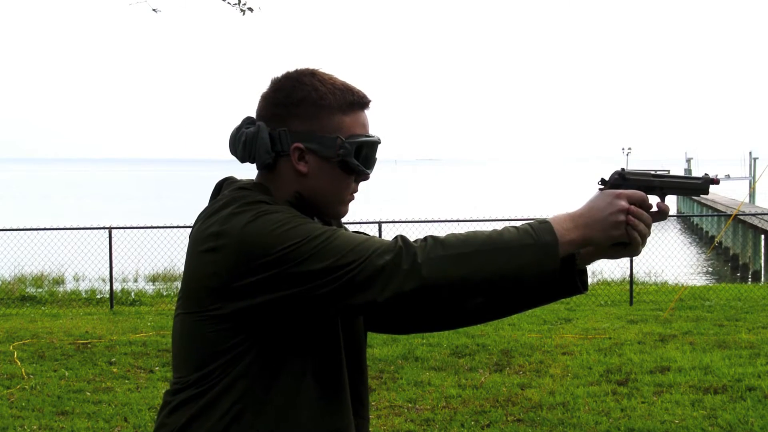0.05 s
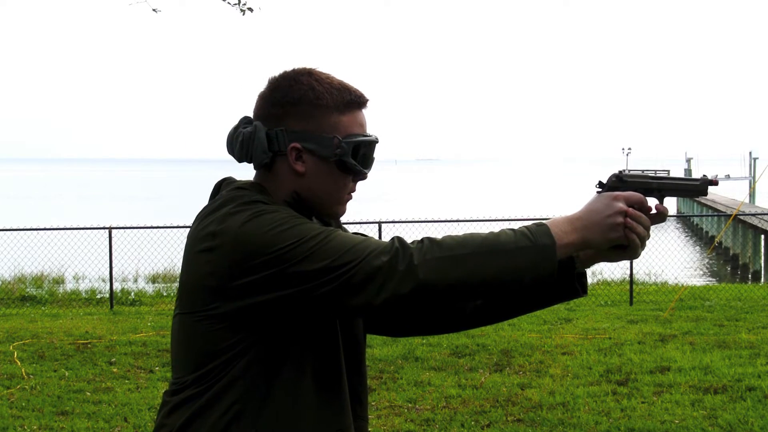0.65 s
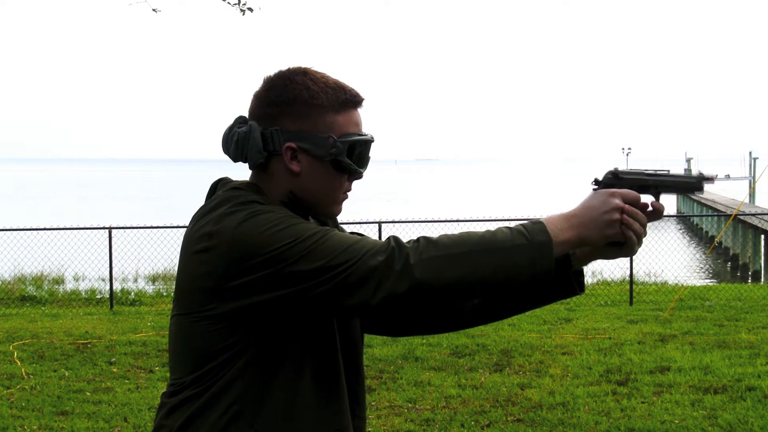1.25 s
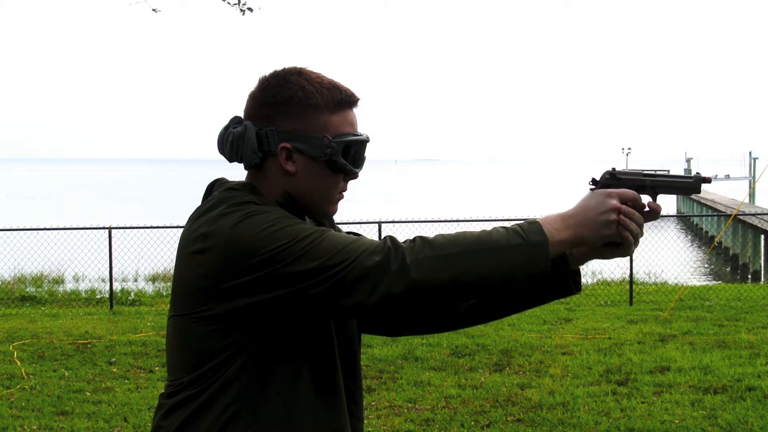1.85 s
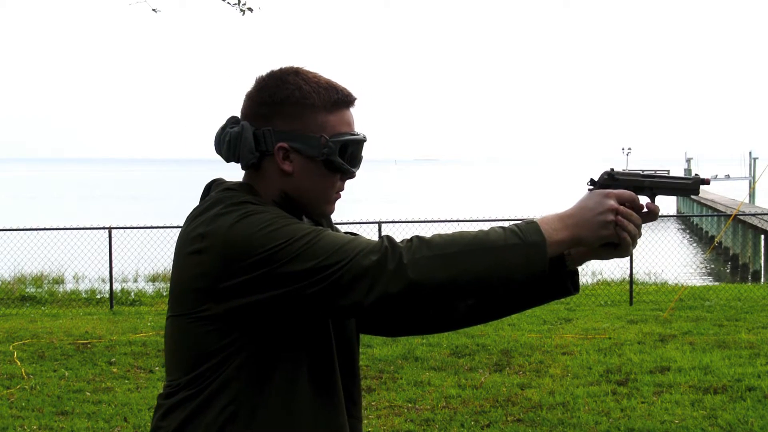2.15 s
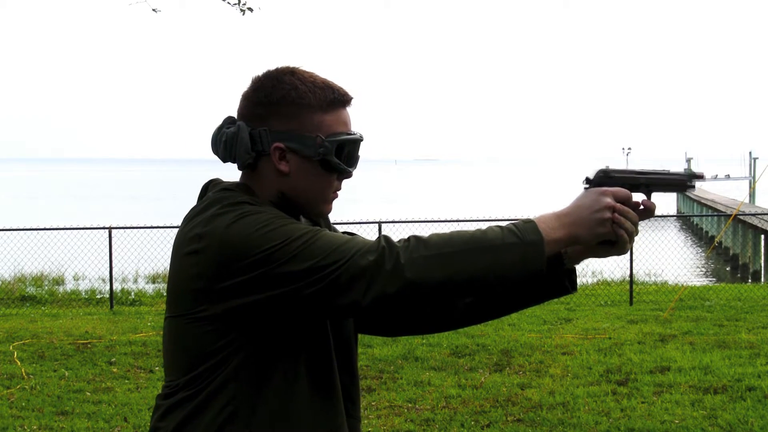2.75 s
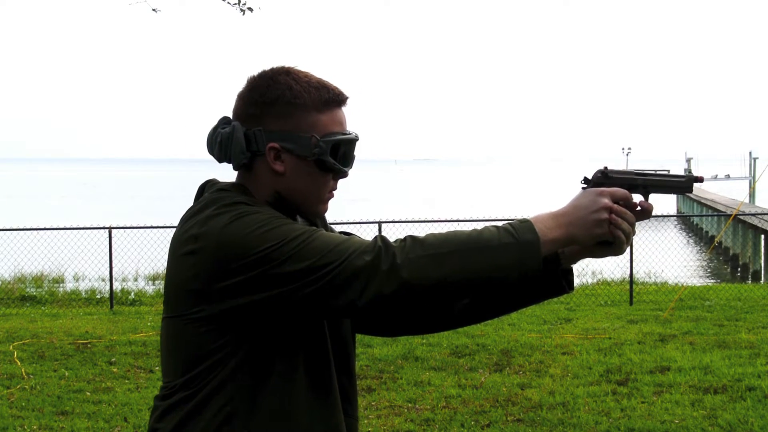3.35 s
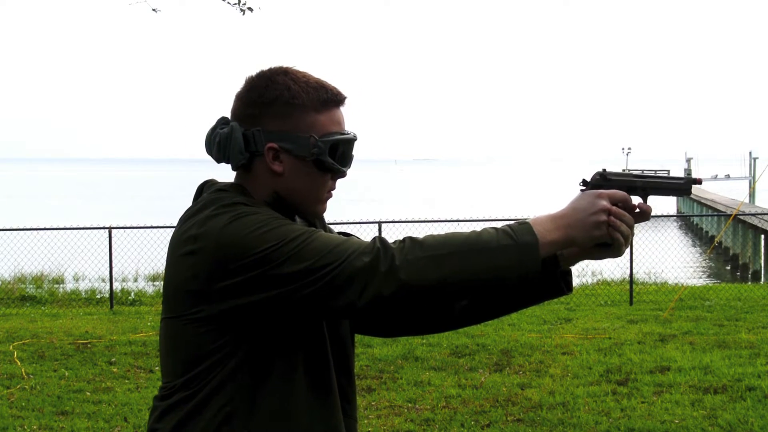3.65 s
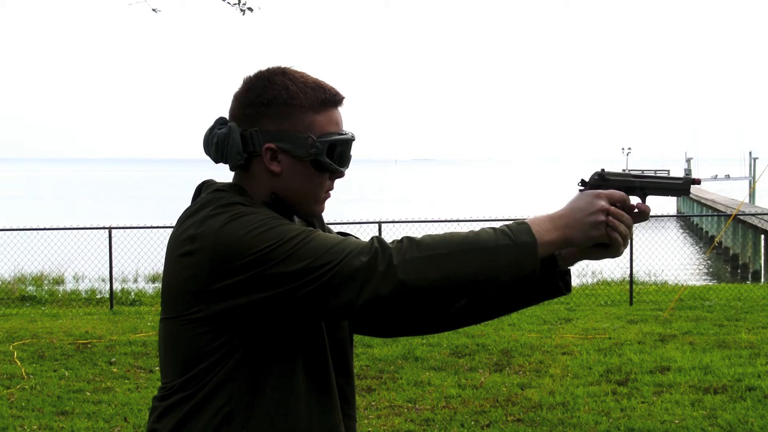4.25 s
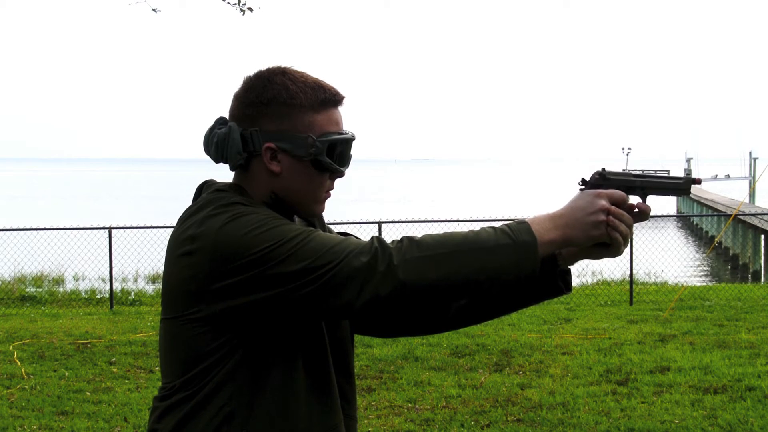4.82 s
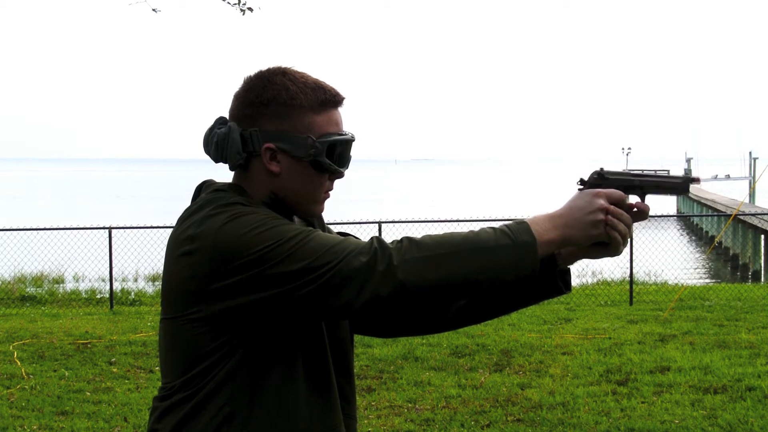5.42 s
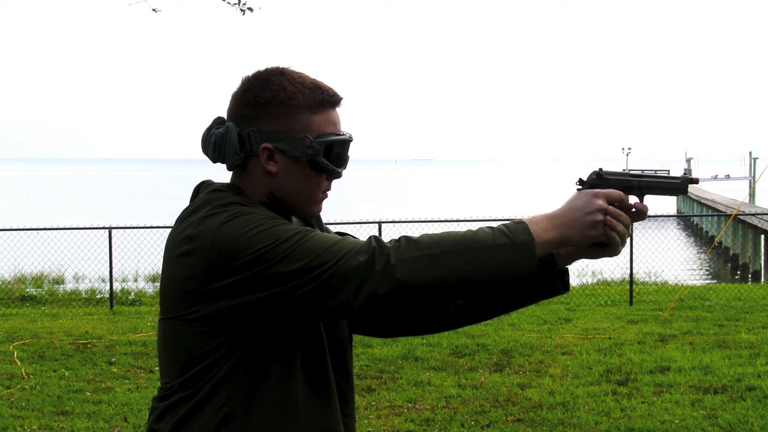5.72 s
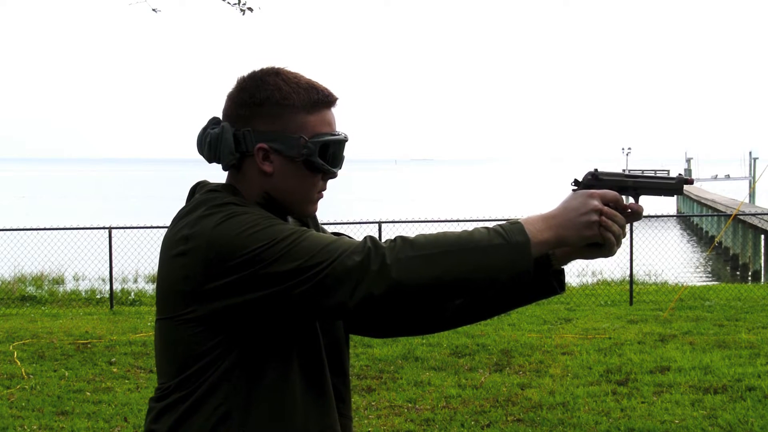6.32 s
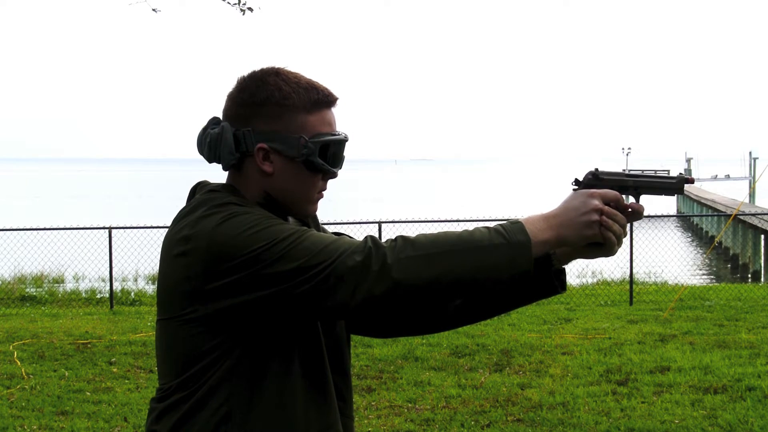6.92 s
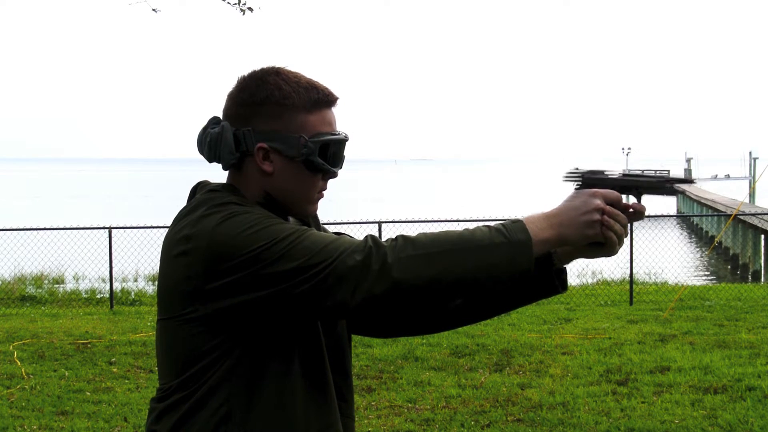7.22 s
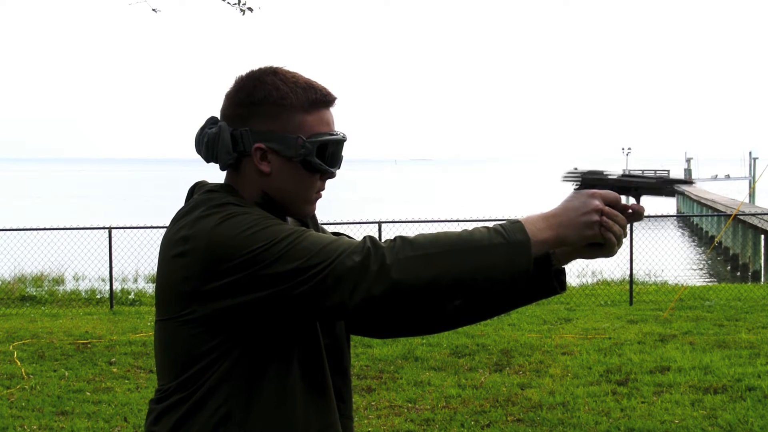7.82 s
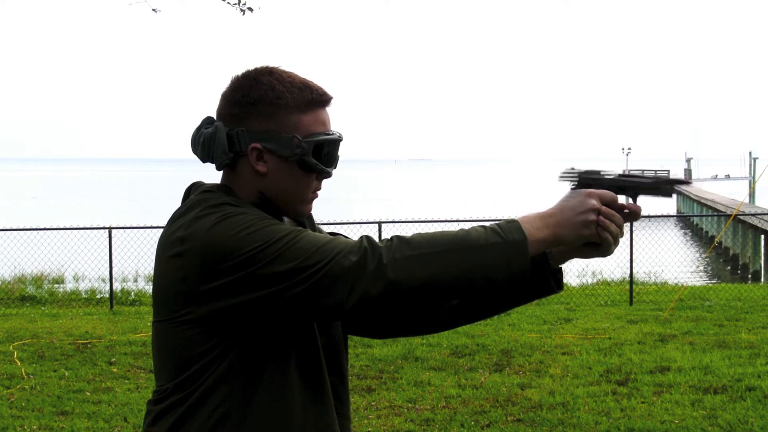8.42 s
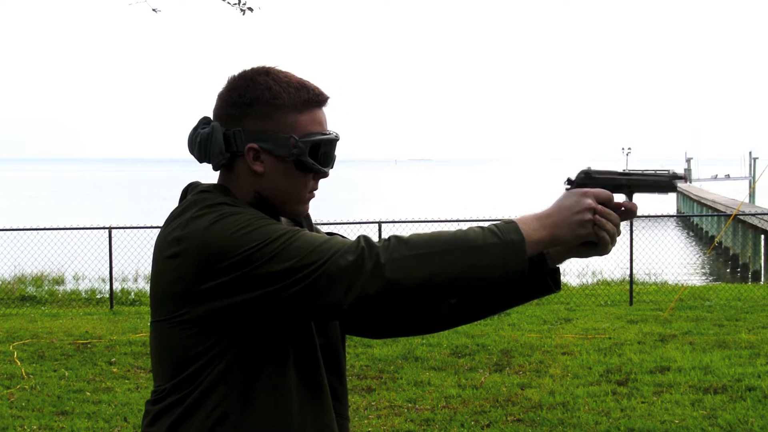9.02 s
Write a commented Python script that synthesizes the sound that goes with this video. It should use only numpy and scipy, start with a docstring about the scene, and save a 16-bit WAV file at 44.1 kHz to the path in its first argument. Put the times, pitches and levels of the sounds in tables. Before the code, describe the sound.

Outdoors, a gas airsoft pistol fires fourteen single shots close to the microphone, slightly to the right, gradually speeding up. Each is a sharp pop of gas with a metallic clack of the slide. A moment later the pellet cracks and thuds on a distant target board further right, with a short echo off nearby walls. A faint far motor, airy hiss and light wind rumble lie underneath.

```python
"""Airsoft pistol on a waterside lawn.

A gas blowback pistol fires fourteen shots close by, a little right of the stereo microphones. Each is
trigger, hammer, gas blast, then the slide flying back and slamming shut; the pellet hits a far target
further right. Nearby walls scatter it all, a distant motor drones, a breeze rumbles on the microphones,
and the recorder's gain control ducks after every overloading blast."""
import sys
import numpy as np
from scipy import signal
from scipy.fft import rfft, irfft, next_fast_len
from scipy.io import wavfile

SR = 44100
rng = np.random.default_rng(int(sys.argv[2]) if len(sys.argv) > 2 else 0)


def master(y):
    """Save y as 16-bit WAV."""
    cut = np.clip(np.atleast_2d(y).T, -1, 1)
    pcm = np.round(cut * 32767)  # scale
    wavfile.write(sys.argv[1], SR, pcm.astype(np.int16))


N = 404397
FFT_SIZE = next_fast_len(N + SR, real=True)
HZ = np.maximum(np.arange(FFT_SIZE // 2 + 1) * SR / FFT_SIZE, 1)

# The pistol's shots. Each row: start in seconds, trigger click in dB.
SHOT_CUES = [(0.3793, -19), (1.2017, -13), (1.9910, -44), (2.7120, -19), (3.4270, -21), (4.1064, -37),
             (4.7339, -23), (5.3660, -45), (5.9970, -25), (6.6259, -45), (7.2246, -32.5), (7.8259, -26),
             (8.4274, -23), (8.9806, -24)]
# Pellets on the target. Each row: start in seconds, crack in dB, board thud in dB.
PELLET_HITS = [(0.5648, -6, -17), (0.574, 1.5, -42), (1.3524, -7, -29), (1.594, -34, -35.5),
               (2.1423, -8, -16.5), (2.86, -12.5, -17.5), (3.5754, 0.5, -34), (3.584, -5.5, -46),
               (4.2593, -17, -20.5), (4.8837, -10, -20.5), (5.5184, -1.5, -34), (6.1488, -14, -22),
               (6.7765, -12.5, -22), (7.375, -14.5, -21), (7.9786, -10.5, -20), (8.5803, -17, -20.5),
               (9.1332, -2, -22.5)]
# Glancing pellets. Each row: start in seconds, level in dB, ring in Hz, relative echo in dB.
STRAY_PELLETS = [(1.3764, -35, 9000, -14), (1.5137, -30, 9800, 12.5), (1.535, -19, 10500, 2),
                 (4.4568, -40, 9000, -2), (6.4529, -25, 13900, 4.5), (6.946, -37, 11100, -12),
                 (6.953, -31, 11000, -13), (8.0006, -22, 9000, -22)]
# Wind on the microphones. Each row: time in seconds, level in dB.
BREEZE_LEVELS = [(0, -51), (1.1, -62.5), (1.9, -57.5), (3.3, -57), (5.3, -65), (9.1, -61.5)]
# Echo off the walls. Each row: frequency in Hz, seconds to fall by 60 dB.
ECHO_DECAY = [(100, 0.32), (500, 0.41), (2000, 0.44), (6000, 0.45), (10000, 0.45), (16000, 0.23)]
# The left microphone's response. Each row: frequency in Hz, gain in dB.
LEFT_MIC_RESPONSE = [(30, 0.8), (500, 3.75), (2000, 1), (4000, -0.46), (10000, 1.5), (12500, -0.5),
                     (14500, -6), (16000, -6)]

# Broad spectra. Each row: frequency in Hz, relative level in dB.
MOTOR_TONE = [(20, -28), (50, -24), (100, -6.5), (135, -8.5), (190, -6), (400, -7), (650, -6.5), (900, -9),
              (1500, -10), (3000, -11), (16000, -56)]  # distant drone
AIR_TONE = [(20, 9), (500, -6), (2000, 1), (4000, 0.5), (9000, -0.5), (12000, -2), (16000, -4.5)]  # open-air hiss
WIND_TONE = [(20, -26), (50, -6), (100, 4), (150, -1.5), (220, -11.5), (600, -31.5), (16000, -77)]  # rumble on the microphones
WALL_TONE = [(30, -24), (200, -9), (500, -5), (900, -6), (1800, 3), (4000, 0), (7000, -0.5), (11000, 1.5),
             (13000, 3.5), (16000, 4)]  # scatter off the walls
CRACK_TONE = [(30, -40), (500, -30), (2000, -11), (2800, 2.5), (4800, -4), (7500, 1), (10000, 4.5),
              (13000, 3.5), (16000, -8)]  # pellet impact
BOARD_TONE = [(30, -41), (300, -45), (550, -9.5), (750, 1), (1050, 0), (1400, -3), (2200, -0.5), (4000, 0),
              (8000, -11), (16000, -18.5)]  # thud of the target board
STAND_TONE = [(30, -17), (130, -35), (200, -1), (290, -7.5), (500, -11), (1200, -13), (16000, -72)]  # boom of its stand
METAL_TONE = [(30, -40), (200, -35.5), (500, -16.5), (1400, -22), (1800, -8), (3200, -6.5), (5000, -2.5),
              (8000, -0.5), (11000, 3), (13500, -4), (16000, -1.5)]  # slide and frame
JET_TONE = [(30, -24), (300, -19.5), (700, -7), (1400, -7), (2200, -2), (3800, -3), (6500, -4), (9500, 2),
            (12000, 0), (16000, -2.5)]  # rushing gas
POP_TONE = [(30, -13.5), (100, -13.5), (300, 1.5), (1100, -3), (2500, -2), (6000, 1), (16000, -32.5)]  # pressure pop at the muzzle
LAWN_TONE = [(30, -16), (150, -8.5), (300, -6), (500, 5.5), (720, 0.5), (900, -7), (1250, -0.5),
             (2000, -20.5), (4000, -30), (16000, -25)]  # bounce off the grass

# Resonances. Each row: centre in Hz, width in Hz, boost in dB.
MOTOR_WHINE = [(458, 8.8, 7.5), (640, 24, 5.3), (1135, 55, 10.9), (1279, 20, 13.7)]
BOARD_RESONANCES = [(824, 140, 1.7)]
SLIDE_RESONANCES = [(980, 190, 5), (1760, 140, 4.5), (2590, 130, 2.5), (6580, 560, 3), (11000, 250, 5),
                    (13560, 210, 14)]
BARREL_RESONANCES = [(2050, 210, 4.1), (3770, 360, 5.9), (4580, 230, 6.7), (9200, 1500, 1.6)]


def from_db(db):
    """Decibels to gain."""
    return 10 ** (np.asarray(db) / 20)


def samples(ms):
    """Milliseconds to samples."""
    return np.asarray(ms) * SR / 1000


def at_hz(points, hz):
    """Read a table along a log-frequency axis."""
    frequencies, values = np.transpose(points)
    return np.interp(np.log(hz), np.log(frequencies), values)


def smooth(x, ms):
    """A one-pole lag with the given time constant."""
    pole = np.exp(-1 / samples(ms))
    return signal.lfilter([1 - pole], [1, -pole], x)


def colour(x, spectrum, modes=()):
    """Causal (minimum-phase) filter of unit power gain with resonances on a broad spectrum."""
    peaks_db = sum(db / (1 + (2 * (HZ - hz) / width) ** 2) for hz, width, db in modes)
    gain = from_db(at_hz(spectrum, HZ) + peaks_db)
    gain /= np.sqrt(np.mean(gain ** 2))
    cepstrum = irfft(np.log(gain), FFT_SIZE)[:FFT_SIZE // 2]
    cepstrum[1:] *= 2
    return irfft(rfft(x, FFT_SIZE) * np.exp(rfft(cepstrum, FFT_SIZE)), FFT_SIZE)[..., :N]


def ringing(x, hz, width_hz):
    """One resonance, scaled up to make good the power a narrow band loses."""
    b, a = signal.iirpeak(hz, hz / width_hz, fs=SR)
    return signal.lfilter(b, a, x) * np.sqrt(SR / (np.pi * width_hz))


def spikes(times, height, after_ms=0):
    """One spike per event; times are in seconds."""
    out = np.zeros(N)
    index = np.round(np.asarray(times) * SR + samples(after_ms)).astype(int)
    np.add.at(out, np.clip(index, 0, N - 1), height)
    return out


def pulses(times, db, after_ms=0):
    """Single pressure pulses; dB is the level over 0.59 ms."""
    return spikes(times, from_db(db) * np.sqrt(samples(0.59)), after_ms)


def bursts(times, db, decay_ms, after_ms=0):
    """Noise that starts at once and dies away."""
    onsets = spikes(times, from_db(db), after_ms) + 1e-18
    envelope = signal.lfilter([1], [1, -np.exp(-1 / samples(decay_ms))], onsets)
    return envelope * rng.standard_normal(N)


def delayed(x, ms):
    """A later copy."""
    return irfft(rfft(x, FFT_SIZE) * np.exp(-2j * np.pi * HZ / SR * samples(ms)), FFT_SIZE)[:N]


def placed(x, lag_ms, left_db):
    """Sound from the right reaches the left microphone later and weaker."""
    return np.array([delayed(x, lag_ms) * from_db(left_db / 2), x * from_db(-left_db / 2)])


def diffuse(count, mic_spacing_s=0.00029):
    """Noise from all around: alike at both microphones in the bass, unrelated in the treble."""
    alike = np.sinc(2 * mic_spacing_s * np.arange(count // 2 + 1) * SR / count)
    mid, side = rfft(rng.standard_normal((2, count))) * np.sqrt([(1 + alike) / 2, (1 - alike) / 2])
    return irfft([mid + side, mid - side], count)


def distant_motor(start_db=-51, half_amplitude_s=6.7):
    """A far motor drones with a faint whine, fading as it recedes."""
    t = np.arange(N) / SR
    level = from_db(start_db) / (1 + t / half_amplitude_s)
    return level * colour(diffuse(N), MOTOR_TONE, MOTOR_WHINE)


def open_air(start_db=-49.5, fade_db_per_s=0.84):
    """The hiss of the open air, all around and slowly fading."""
    t = np.arange(N) / SR
    return from_db(start_db - fade_db_per_s * t) * colour(diffuse(N), AIR_TONE)


def breeze(gust_db=1.5, gust_hz=6.0):
    """A light breeze rumbles on the microphones in short gusts."""
    t = np.arange(N) / SR
    gusts = np.interp(t * gust_hz, np.arange(200), rng.standard_normal(200))
    level_db = np.interp(t, *np.transpose(BREEZE_LEVELS)) + gust_db * gusts
    return from_db(level_db) * colour(diffuse(N), WIND_TONE)


def wall_echoes(x, build_ms=9.8):
    """Nearby walls scatter the sound: in each band its energy builds and dies away as diffuse noise."""
    source = rfft(colour(x, WALL_TONE), FFT_SIZE)
    noise = rfft(diffuse(FFT_SIZE))
    centres_hz = np.geomspace(130, 15000, 13)
    echoes = 0
    for hz, share in zip(centres_hz, np.eye(len(centres_hz))):
        band = np.sqrt(np.interp(np.log(HZ), np.log(centres_hz), share))
        power = irfft(source * band, FFT_SIZE)[:N] ** 2
        power = smooth(smooth(power, build_ms), build_ms)
        fall = 1e-6 ** (1 / (SR * at_hz(ECHO_DECAY, hz)))  # share of power left after one sample
        power = signal.lfilter([1 - fall], [1, -fall], power)
        echoes += np.sqrt(power / np.mean(band ** 2)) * irfft(noise * band, FFT_SIZE)[:, :N]
    return echoes


def stray_ticks():
    """Stray pellets glance off things; returns the direct ticks and what they send to the walls."""
    direct, to_walls = 0, 0
    for start, db, hz, echo_db in STRAY_PELLETS:
        tick = bursts(start, db, decay_ms=1.8) + pulses(start, db - 4.5, after_ms=1)
        ping = ringing(tick, hz, width_hz=6000) + from_db(-9.5) * tick
        direct += ping
        to_walls += ping * from_db(echo_db)
    return direct, to_walls


def metal_ping(start_s=6.4545):
    """One stray tick comes from a small piece of metal that rings on."""
    ring = ringing(bursts(start_s, -28.5, decay_ms=60), hz=11400, width_hz=350)
    return ring + colour(pulses(start_s, -36), METAL_TONE)


def target(rebound_ms=6.2):
    """Downrange, the pellet cracks on the board, rebounds behind it, flaps it and shakes the stand."""
    times, crack_db, thud_db = np.transpose(PELLET_HITS)
    crack = pulses(times, crack_db + 0.58) + bursts(times, crack_db - 0.9, decay_ms=2.3)
    rebound = pulses(times, thud_db + 2.5, after_ms=rebound_ms)
    rebound += bursts(times, thud_db, decay_ms=4.3, after_ms=rebound_ms)
    thud = bursts(times, thud_db - 2.5, decay_ms=9.7)
    thud += bursts(times, thud_db, decay_ms=7.7, after_ms=rebound_ms)
    for flap_ms in rng.uniform(22, 60, (len(times), 3)).T:
        thud += bursts(times, thud_db - 7.5, decay_ms=5.9, after_ms=flap_ms)
    softness_db = thud_db - crack_db  # a soft hit cracks less and pushes the stand more
    boom = bursts(times, thud_db - 9.5 + 2.63 * softness_db, decay_ms=43, after_ms=rebound_ms)
    board = colour(thud, BOARD_TONE, BOARD_RESONANCES)
    return colour(crack + rebound, CRACK_TONE) + board + colour(boom, STAND_TONE)


def gas_supply(full_db=15, cooling_db_per_s=0.9749):
    """The magazine cools as it empties; returns shot times, blast levels and the dB lost to cooling."""
    times = np.transpose(SHOT_CUES)[0]
    lost_db = cooling_db_per_s * times
    return times, full_db - lost_db, lost_db


def slide_ring():
    """The slide sings on briefly after it is struck."""
    times = np.transpose(SHOT_CUES)[0]
    return ringing(bursts(times, -26, decay_ms=55, after_ms=22), hz=6700, width_hz=110)


def mechanism():
    """The pistol's clatter at close range: every contact rings the same slide and frame."""
    times, blast_db, lost_db = gas_supply()
    trigger_db = np.transpose(SHOT_CUES)[1]
    # the trigger clicks before the shot, and again as the finger lets it back
    reset_times = times + 0.13 + 0.006 * rng.standard_normal(len(times))
    trigger = bursts(times, trigger_db + 0.5, decay_ms=1.7, after_ms=-11.6)
    trigger += bursts(reset_times, -17, decay_ms=2.3)
    # the hammer swings, strikes the valve, and gas begins to hiss
    hammer = bursts(times, -33.5, decay_ms=3.7, after_ms=-6)
    hammer += bursts(times, -17, decay_ms=2.5, after_ms=-4)
    hiss = bursts(times, -14.5, decay_ms=14, after_ms=-4)
    # gas drives the slide back and vents from the open breech
    vent = bursts(times, blast_db - 3, decay_ms=7.2, after_ms=2.6)
    vent += bursts(times, blast_db - 3, decay_ms=5.4, after_ms=8.2)
    # on cooler gas the slide reaches its rear stop later and lands more softly
    travel_ms = 10 + 0.75 * lost_db
    stop_db, shut_db = 11.5 - 0.98 * lost_db, 2.65 - 0.86 * lost_db
    stop = bursts(times, stop_db, decay_ms=3.3, after_ms=travel_ms)
    stop += bursts(times, stop_db - 8, decay_ms=5.7, after_ms=travel_ms + 3.8)
    # the spring returns the slide: it picks up a pellet, then slams shut
    shut = bursts(times, shut_db, decay_ms=6.3, after_ms=51)
    shut += bursts(times, shut_db - 5.5, decay_ms=6.1, after_ms=54.5)
    rail_scrape = bursts(times, -11.5, decay_ms=23, after_ms=39.5)
    clatter = trigger + hammer + hiss + vent + stop + rail_scrape + shut
    return colour(clatter, METAL_TONE, SLIDE_RESONANCES)


def muzzle_blast(open_ms=2.6, hand_ms=1.05, body_ms=4.15, lawn_ms=8.0):
    """The valve opens briefly: a pressure pop and a jet of gas, thrown back by hands, body and lawn."""
    times, blast_db, lost_db = gas_supply()
    flow = from_db(blast_db)
    valve = np.cumsum(spikes(times, flow) - spikes(times, flow, after_ms=open_ms))
    jet = colour(valve * rng.standard_normal(N), JET_TONE, BARREL_RESONANCES)
    # as the gas cools, the pop weakens faster than the jet
    pop = colour(pulses(times, blast_db - 2 - 1.12 * lost_db), POP_TONE)
    blast = jet + pop + from_db(-7) * delayed(pop, hand_ms)
    off_body = from_db(-10) * delayed(pop, body_ms)
    off_body += colour(pulses(times, blast_db - 2.5, after_ms=body_ms), JET_TONE)
    off_lawn = from_db(-10) * colour(delayed(blast + off_body, lawn_ms), LAWN_TONE)
    return blast + off_body + off_lawn


def scene():
    """The pistol is close and dry; the target is far, so its echoes are nearly as strong as its crack."""
    pistol = muzzle_blast() + mechanism()
    # the mechanism radiates unevenly, so each microphone also hears clatter of its own
    spread = from_db(-10) * np.array([mechanism(), mechanism()])
    ticks, ticks_to_walls = stray_ticks()
    hits = target()
    near = placed(pistol + slide_ring() + metal_ping(), lag_ms=0.033, left_db=-0.3) + spread
    far = placed(hits + ticks, lag_ms=0.13, left_db=-8)
    echoes = wall_echoes(from_db(-19) * pistol + from_db(-4.5) * hits + ticks_to_walls)
    return near + far + echoes + distant_motor() + open_air() + breeze()


def gain_control(x, threshold_db=-10, detector_ms=5.35, attack_ms=0.94, release_db_per_s=42):
    """The recorder's gain drops quickly when the sound is too loud and creeps back."""
    level_db = 10 * np.log10(smooth(np.mean(x ** 2, axis=0), detector_ms) + 1e-12)
    excess_db = np.maximum(level_db - threshold_db, 0)
    release_db = release_db_per_s * np.arange(N) / SR
    cut_db = np.maximum.accumulate(excess_db + release_db) - release_db
    return x * from_db(-smooth(cut_db, attack_ms))


def record(dry, ceiling=0.82, cutoff_hz=16100):
    """Gain control, overload on the blasts, a duller left microphone and a steep top cut."""
    left, right = np.clip(gain_control(dry), -ceiling, ceiling)
    left = irfft(rfft(left, FFT_SIZE) * from_db(at_hz(LEFT_MIC_RESPONSE, HZ)), FFT_SIZE)[:N]
    top_cut = signal.ellip(10, 0.05, 60, cutoff_hz, fs=SR, output="sos")
    return signal.sosfiltfilt(top_cut, [left, right])


dry = scene()
out = record(dry)
master(out)
```